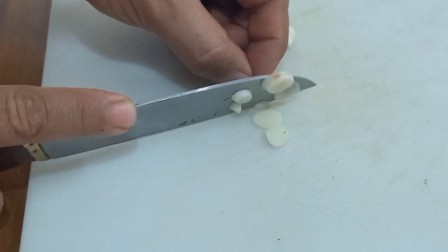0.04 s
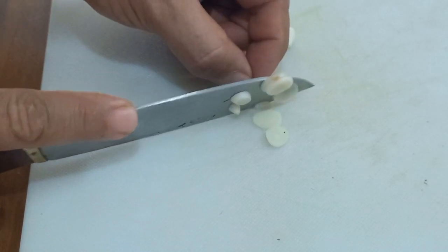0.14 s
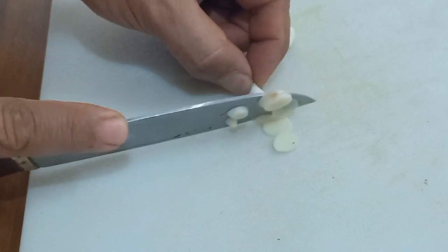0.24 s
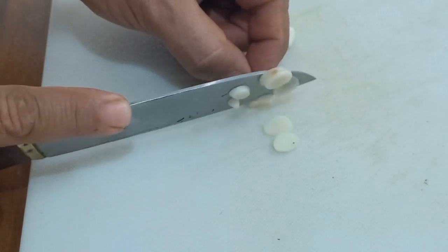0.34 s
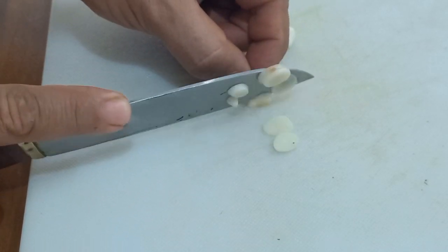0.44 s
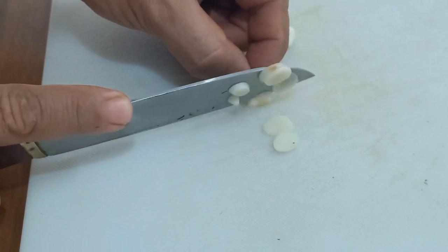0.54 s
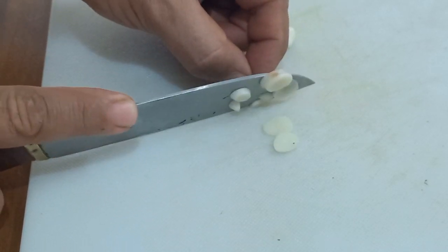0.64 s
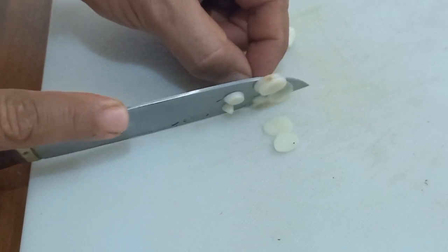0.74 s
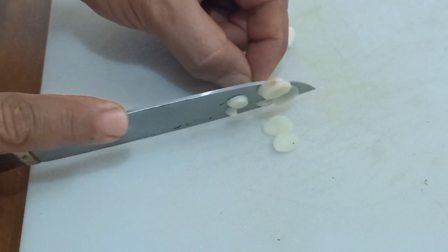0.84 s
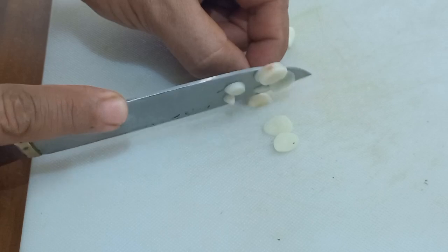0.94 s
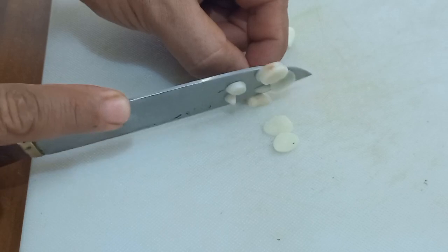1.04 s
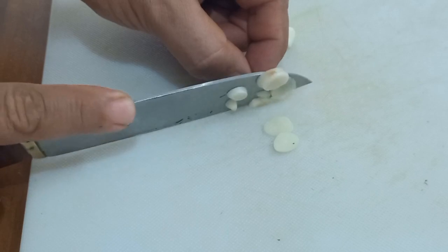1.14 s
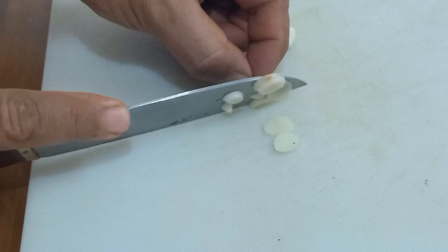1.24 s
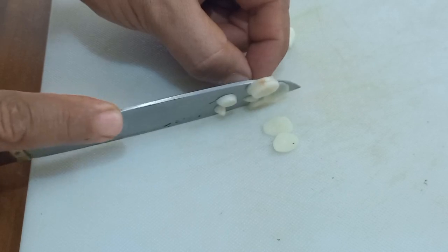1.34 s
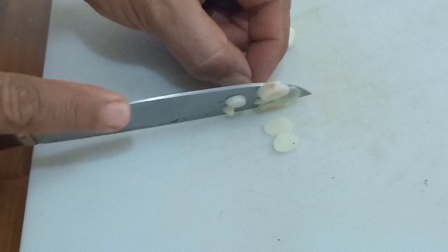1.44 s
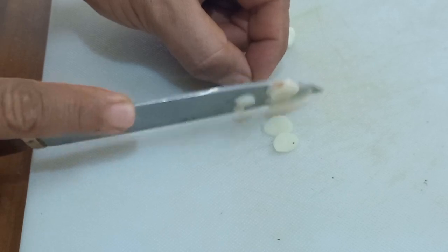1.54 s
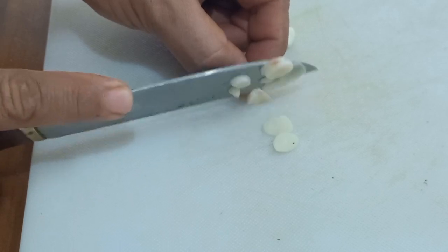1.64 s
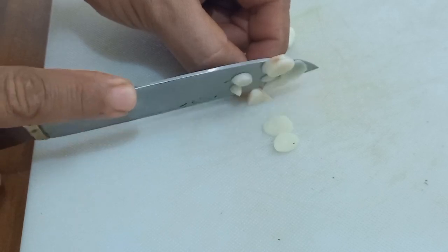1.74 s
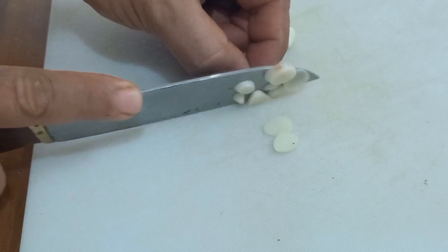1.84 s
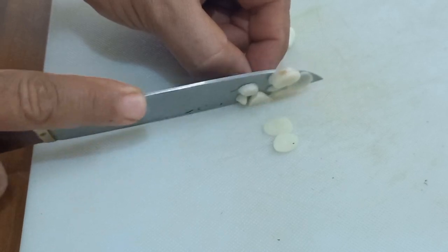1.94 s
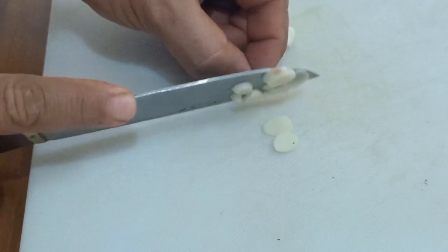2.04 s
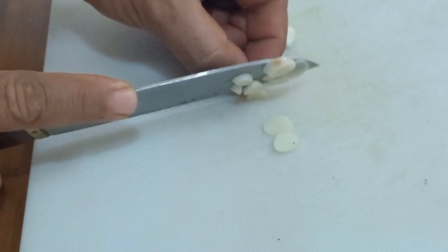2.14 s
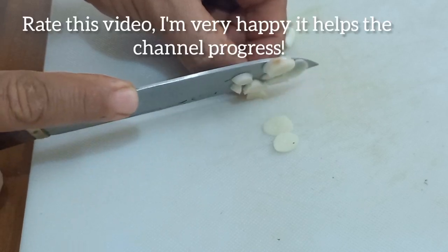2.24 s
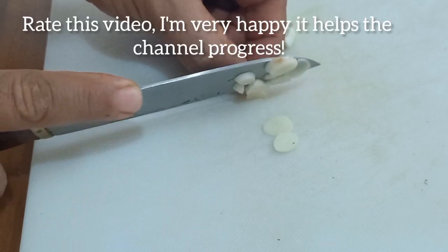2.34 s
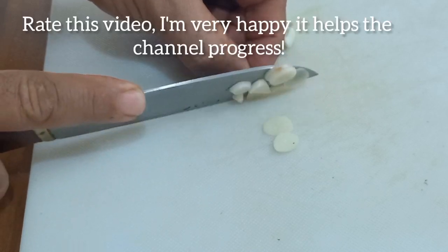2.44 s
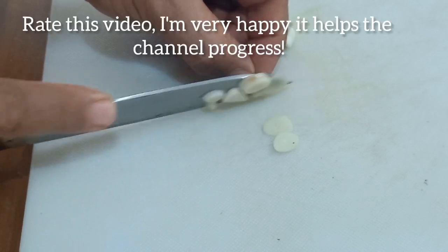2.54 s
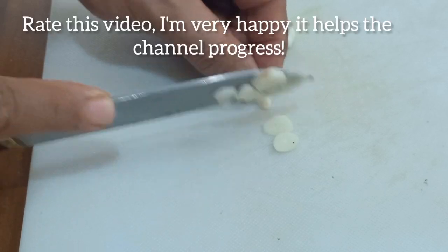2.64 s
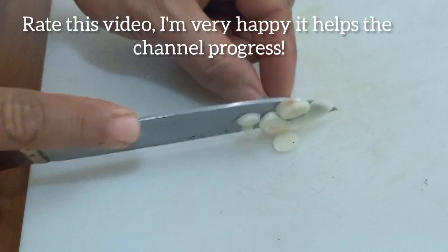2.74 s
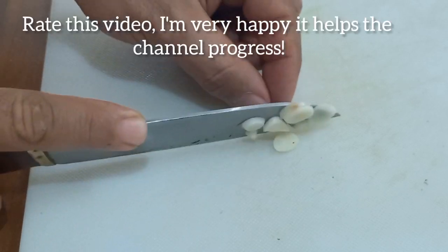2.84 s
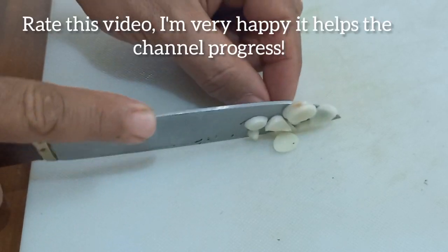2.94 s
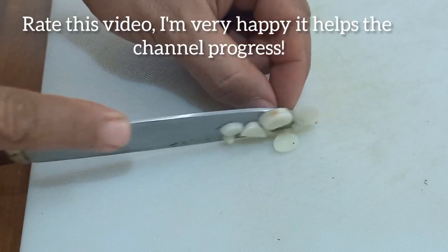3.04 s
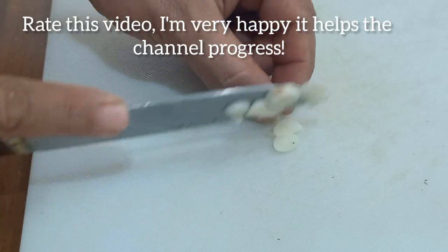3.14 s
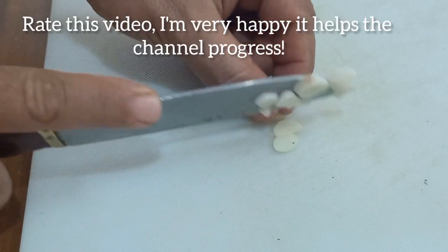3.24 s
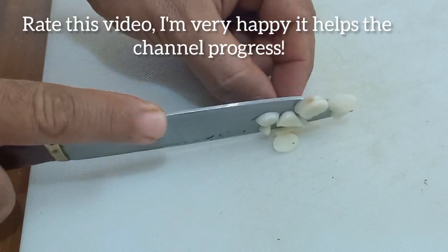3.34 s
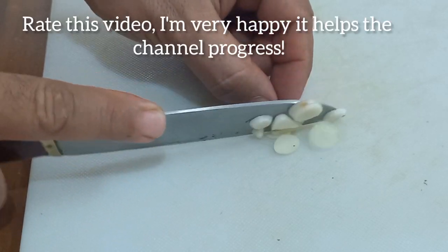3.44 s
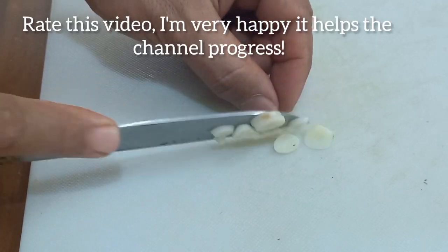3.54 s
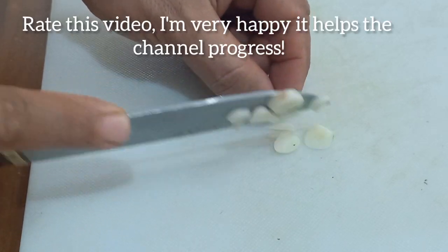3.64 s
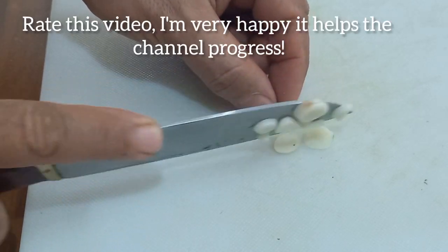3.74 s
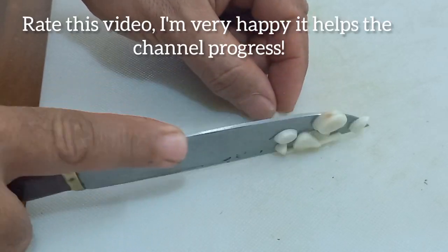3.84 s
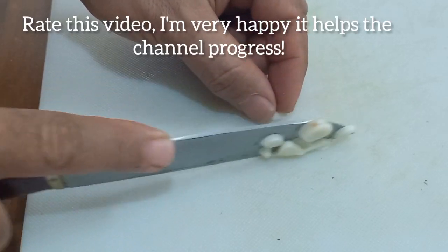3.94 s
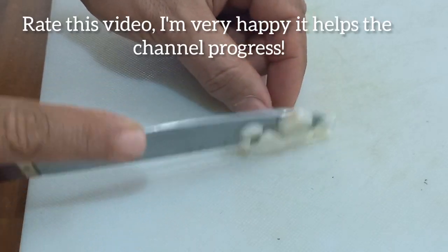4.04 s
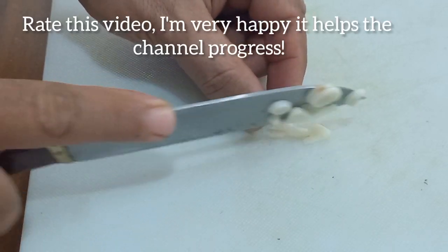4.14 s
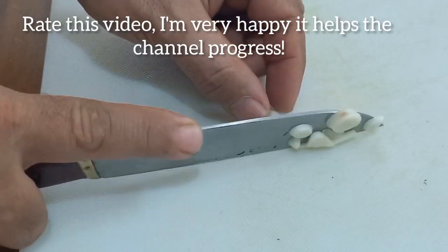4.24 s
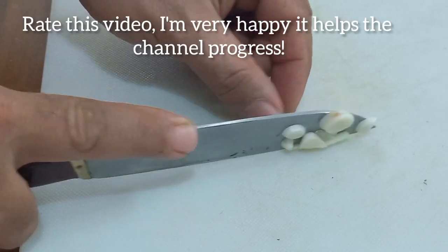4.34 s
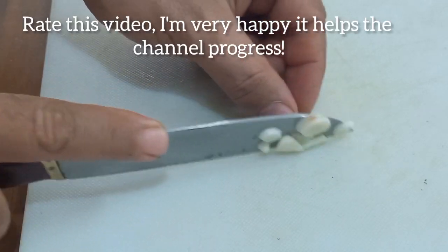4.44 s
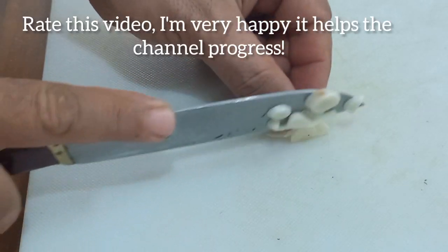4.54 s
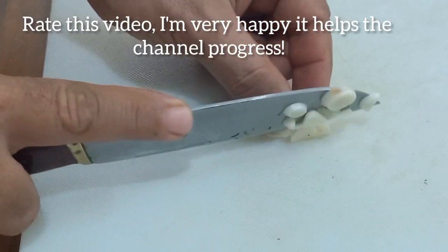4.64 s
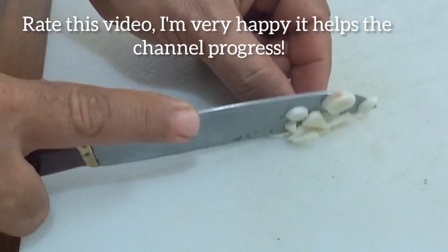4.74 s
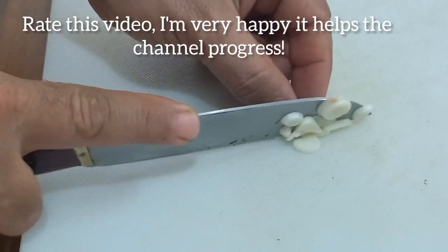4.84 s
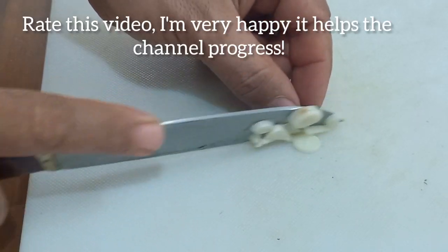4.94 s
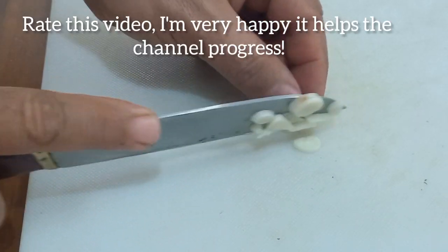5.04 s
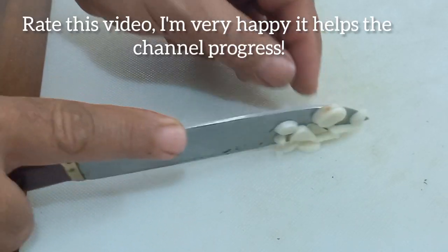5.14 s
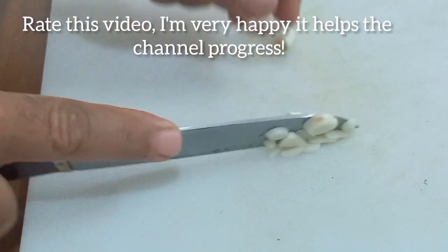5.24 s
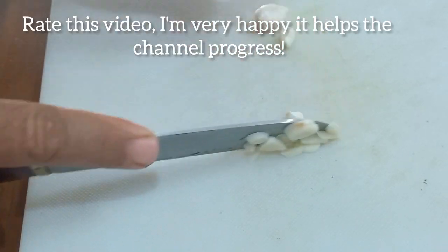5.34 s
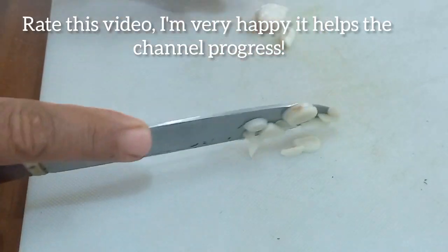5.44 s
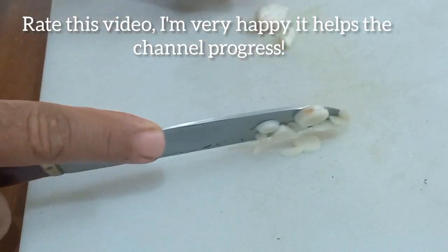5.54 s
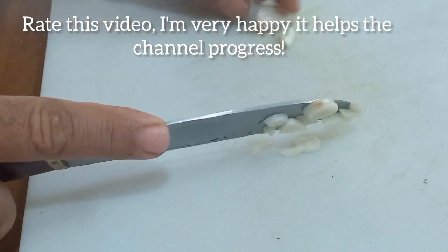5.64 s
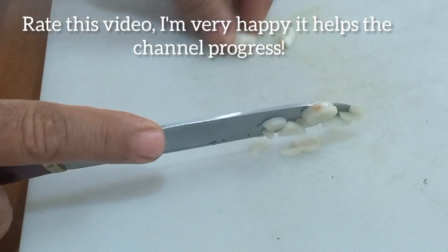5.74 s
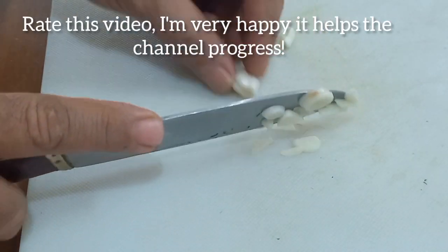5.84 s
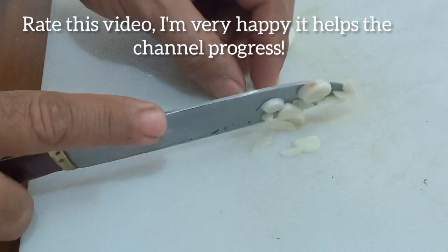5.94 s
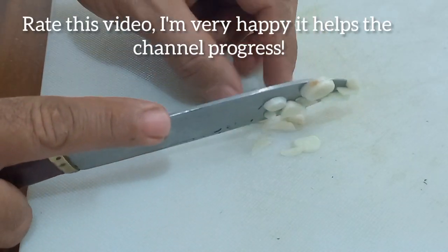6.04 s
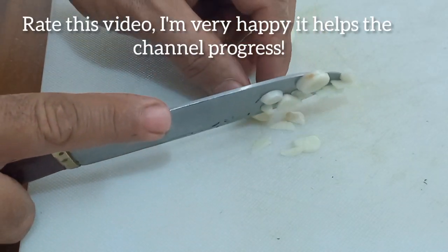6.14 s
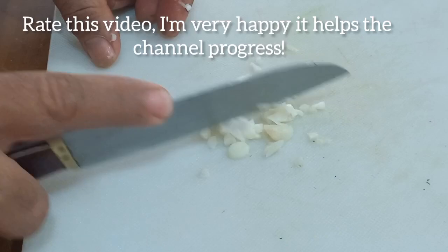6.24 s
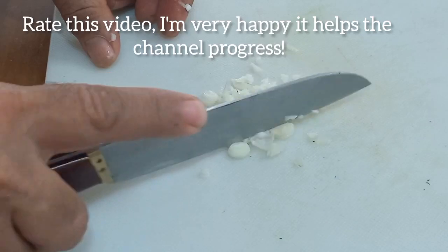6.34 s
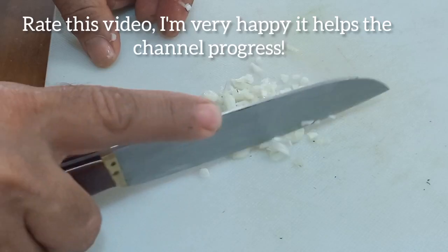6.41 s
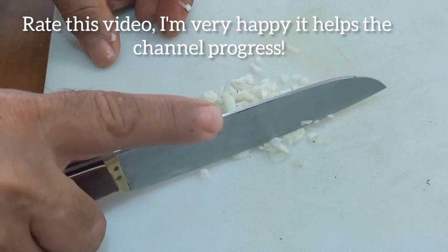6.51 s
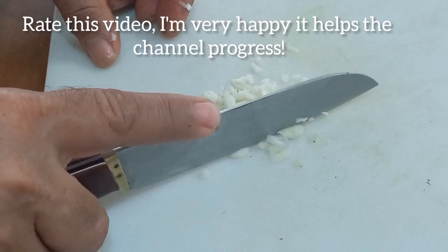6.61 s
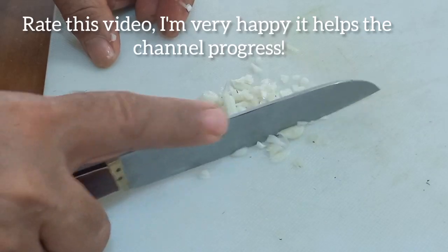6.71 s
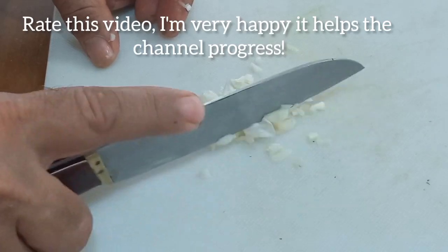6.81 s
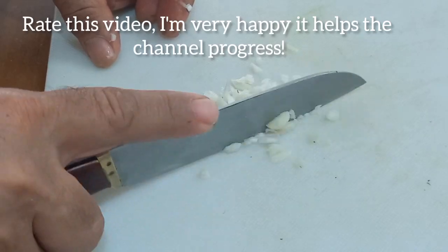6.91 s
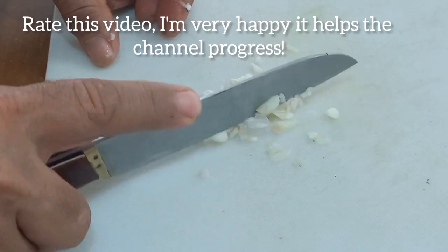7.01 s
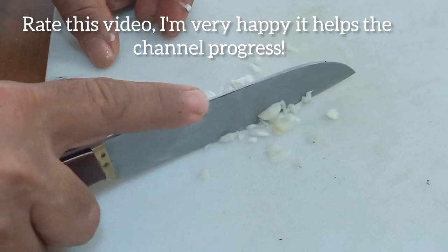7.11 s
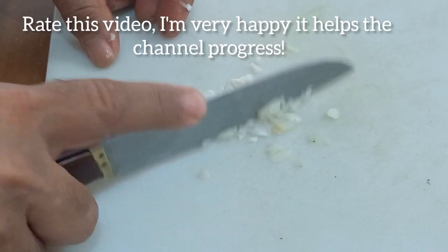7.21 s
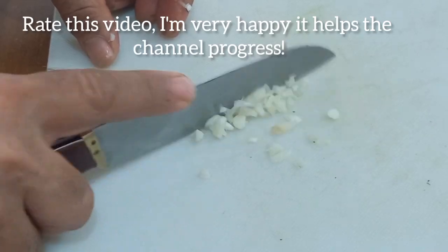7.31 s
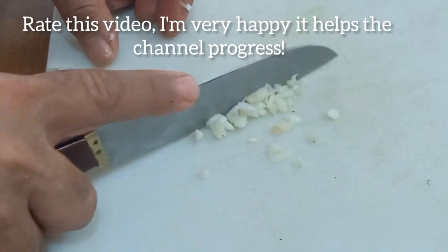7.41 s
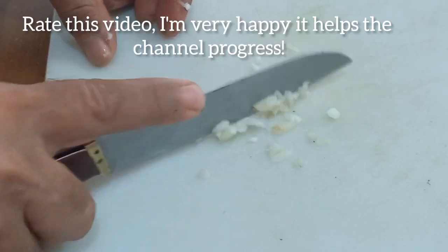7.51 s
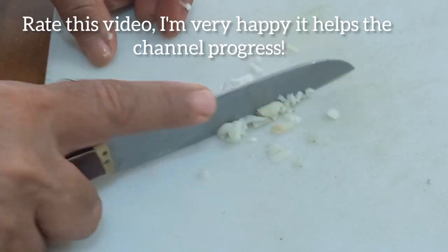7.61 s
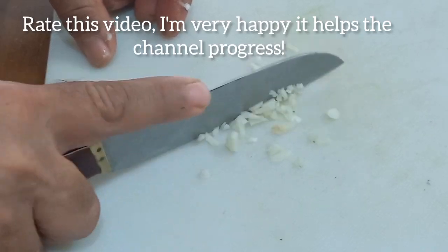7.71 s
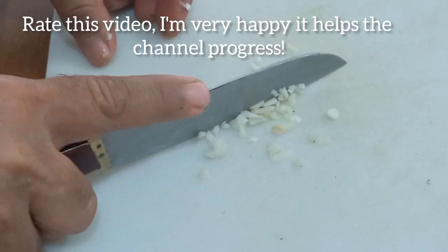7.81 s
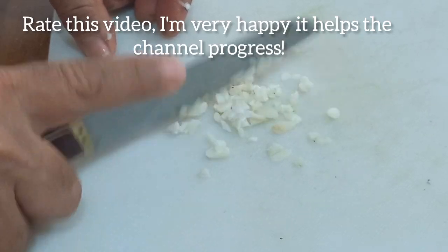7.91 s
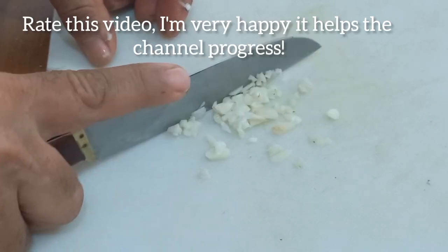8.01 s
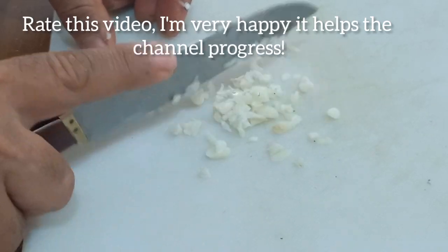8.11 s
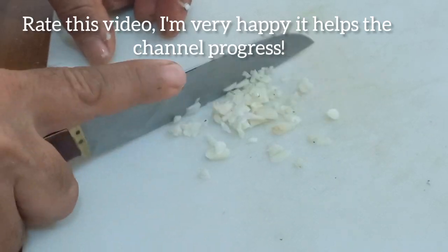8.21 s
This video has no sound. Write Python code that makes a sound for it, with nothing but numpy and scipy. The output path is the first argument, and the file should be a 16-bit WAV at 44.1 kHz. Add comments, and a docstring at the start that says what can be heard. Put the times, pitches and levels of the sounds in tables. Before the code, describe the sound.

Close stereo pickup in a small hard-walled kitchen. A knife slices garlic on a plastic board, each stroke a short hollow clack with a bright click, roughly every half second. Between strokes come faint crunches and dry finger rustle. After a brief pause, duller, heavier mincing chops follow at uneven, quicker spacing. Soft room hiss, a low wavering hum and faint high chirps lie behind.

```python
"""A small hard-walled kitchen: a knife slices garlic on a plastic board, pauses, then minces it.
Each stroke is a set of ringing board, blade and table modes plus a noisy clack, a bright click and a crackle.
Soft pushes, splitting cloves and a dry rustle are built from tiny impacts; shaped noise is the room's answer.
Behind it sit filtered-noise hiss, a wavering low hum from narrow noise bands, and faint fluttering high chirps."""
import sys
import numpy as np
from scipy import signal
from scipy.fft import rfft, irfft, next_fast_len
from scipy.io import wavfile
from scipy.ndimage import uniform_filter1d

SR = 44100
rng = np.random.default_rng(int(sys.argv[2]) if len(sys.argv) > 2 else 0)


def transcribe(u):
    """Save the signal u as a 16-bit wav file named by the first command-line argument.

    u: samples, shape (n,) or (channels, n), limited to [-1, 1]; the rate is SR.
    q: integer samples, one column per channel.
    """
    v = np.clip(np.atleast_2d(u).T, -1, 1)
    q = np.round(v * 32767).astype(np.int16)
    wavfile.write(sys.argv[1], SR, q)


N = 364707  # length in samples

# steady room hiss: [f/Hz, relative level/dB per Hz]
AIR_SPECTRUM = [(30, -9), (85, -21.5), (120, 1), (180, -6.5), (280, -9), (680, -11.5), (950, -21.5),
                (2200, -20), (4500, -20.5), (7400, -26), (8200, -35.5), (10800, -36), (12500, -30.5),
                (16000, -32.5)]
# narrow bands of wavering hum: [f/Hz, width/Hz, level/dB]
HUM_BANDS = [(123.2, 22, -58.5), (231, 39, -61), (1880, 190, -68)]
# kitchen reverberation by band: [f/Hz, relative level/dB, t60/s]
KITCHEN_BANDS = [(60, -4.5, 0.44), (130, 6.5, 0.38), (180, 0, 0.41), (302, 2, 0.34), (635, 0.5, 0.35),
                 (785, 0.5, 0.37), (1200, 3.5, 0.28), (2450, -3, 0.3), (5000, -5.5, 0.27), (9200, -8, 0.27),
                 (16100, 2.5, 0.27)]
# the nearer chirps, likely small birds outside: [t/s, f/Hz, peak level/dB]
NEAR_CHIRPS = [(.155, 3260, -49), (.403, 3320, -45), (.697, 2470, -45), (1.015, 3400, -48.5),
               (1.259, 3100, -51.5), (1.652, 4100, -48), (2.065, 3700, -47), (2.596, 3850, -48),
               (4.098, 3740, -45), (4.12, 4840, -48), (5.059, 3860, -49), (5.32, 3360, -44),
               (5.713, 3520, -49), (6.191, 4000, -47), (6.528, 2790, -48.5), (6.844, 3870, -46.5)]
# spells of dry rustle, likely fingers shifting their grip on the garlic: [start t/s, length/s, level/dB]
GRIP_SHIFTS = [(0, .15, -58.5), (0.526, 0.82, -59), (4.076, 0.12, -57.5), (4.624, 0.064, -53.5),
               (5.493, 0.41, -60), (6.03, 0.37, -64), (7.8, 0.17, -58)]
# garlic splitting under the edge: [t/s, level/dB, length/ms, first snap/dB]
GARLIC_CRUNCHES = [(0.248, -50, 25, 0), (0.293, -54.5, 16, 9), (0.603, -50, 25, -2), (0.8385, -48, 8.5, -1),
                   (1.779, -49, 31, -6), (2.001, -49.5, 12, 2), (3.637, -57, 13, -17),
                   (3.706, -53, 10.3, 3), (4.003, -47, 9.2, 2), (4.636, -53, 57, -4),
                   (5.562, -56.5, 73, -5), (5.8, -55.5, 69, -17), (6.038, -54.5, 32, -12),
                   (7.193, -46, 13.3, -1), (7.315, -54.5, 42, -20), (7.94, -50.5, 39, -3.5)]
# blade and fingers pressing softly on the board: [t/s, level/dB, length/ms, table thump/dB]
SOFT_NUDGES = [(.255, -55.5, 35, -17), (1.384, -50.5, 34, 0), (1.78, -44, 17.4, 13.5), (1.828, -64, 14, 17),
               (1.987, -44.5, 25.4, -17), (2.689, -54, 170, 9), (5.84, -55.5, 109, 8),
               (6.609, -47.5, 9.7, 12), (6.868, -40, 8.8, 19), (7.099, -37.5, 12, 5.5), (7.302, -43, 24, 9),
               (7.514, -43, 13.8, 10), (7.957, -45.5, 19.2, 4)]
# modes of table, board and blade:
# [f/Hz, t60/s, level/dB struck with the tip, with the belly, with the heel]
BOARD_MODES = [(83.6, 0.15, -21, -22, -7.5), (125, 0.18, -3, -3.5, -2.5), (161.5, 0.16, -10.5, -11, -10),
               (239.4, 0.13, -7.5, -14, -3.5), (270, 0.19, -3, -4, -11), (321, 0.052, -4.5, -9.5, -6),
               (346.7, 0.088, -7.5, -2.5, -1.5), (418, 0.11, -2, -11, -2.5), (484.6, 0.11, -3.5, -13, 1.5),
               (588.3, 0.087, 6, 1.5, -7), (647.6, 0.095, 2, 2, 1), (791, 0.36, -17, -0.5, -2.5),
               (860, 0.32, -42, -18, -31), (980, 0.11, 1.5, -6, -44), (1047, 0.029, 2, -20.5, -18),
               (1164, 0.088, -18, -6, -5), (1190, 0.098, -23, -1.5, -2.5), (1302, 0.083, -9, 0.5, -6),
               (1389, 0.16, 2, -10, -1.5), (1473, 0.19, -3, -0.5, -6.5), (1596, 0.24, -2, -8, -9),
               (1894, 0.056, 6.5, -7, -1.5), (1961, 0.075, 0, -18, 2), (2035, 0.049, -7, -16, -8),
               (2275, 0.076, -38, -25, -14), (2649, 0.046, -0.5, -8, -7), (2867, 0.043, -3, -4, -19),
               (3100, 0.027, -14.5, -7, -37), (3370, 0.014, -35.5, -19, -32),
               (3800, 0.0083, -23, -15.5, -32)]
# the crowd of fast-dying board modes between and above those: [f/Hz, relative level/dB]
CLACK_SPECTRUM = [(60, -25), (150, -4.5), (500, 3.5), (1200, 0.5), (1650, -5), (2000, 4), (3000, -4),
                  (4200, -7.5), (6000, -17), (7300, -21.5), (8600, -31), (12000, -36), (16000, -48)]
# knife strokes: [t/s, level/dB, place (0 tip, 1 belly, 2 heel), time the edge takes to settle/ms,
#  settling level/dB, weight of the hand as table thump/dB, sharpness of the contact as tick/dB]
KNIFE_STROKES = [(0.063, -27, 0.26, 8.6, -17, -0.5, -2.5), (0.619, -32.5, 0.12, 9, -2.5, 7.5, -22),
                 (1.112, -23.5, 0.093, 9.75, -5.5, 4, -7), (1.8564, -16, 0, 6.3, -26, 1, -4),
                 (2.4141, -14, 0, 6.05, -7.5, 2, -2), (2.92, -23.5, 1.5, 10.7, -3.5, -4, -1.5),
                 (3.4011, -20, 0.82, 14.4, 6, -4.5, 0.5), (3.8776, -18.5, 0.86, 11.7, -17, -2, 3),
                 (4.2676, -27, 0.72, 7.96, -5, 2, -2.5), (4.8222, -18, 1, 15.4, -0.5, 2.5, 1.5),
                 (5.2158, -30, 0.92, 7.45, -5, 1.5, -5.5), (6.6378, -17, 2, 20, -2.5, 6, 0),
                 (6.8847, -22, 1.6, 14, 2.5, 1.5, -0.5), (7.1132, -24.5, 1.9, 21, 7.5, 5.5, -2.5),
                 (7.5391, -20, 2, 11.6, -2, 5, -2), (7.7321, -27.5, 1.67, 3.9, -5.5, 5.5, -3),
                 (8.1577, -19.5, 1.85, 20.4, 12, -4, 5)]

# room air: level, slow drift and faster flutter
AIR_DB, AIR_DRIFT_DB, AIR_FLUTTER_DB = -55, 0.06, 0.5
# the flock behind the nearer chirps: pitch range, and the softest chirp at each of two distances
FLOCK_LOW_HZ, FLOCK_HIGH_HZ = 2884, 5000
FLOCK_NEAR_DB, FLOCK_FAR_DB = -58, -64
# swell and fade of a grip shift, and the rustle of the resting hand
GRIP_ATTACK_S, GRIP_RELEASE_S, RESTING_GRIP_DB = 0.016, 0.06, -70
# a heavy hand fills out the body of the board (dB, dB per dB of thump)
BODY_DB, BODY_PER_THUMP = 0, 0.49
# a sharp or hard contact cracks (dB, dB per dB of tick, dB per dB above the usual chop)
CRACK_DB, CRACK_PER_TICK, CRACK_PER_LEVEL, USUAL_CHOP_DB = -0.8, 0.18, 0.21, -22
# pressed hard or struck with the heel, the board sends less into the room (dB, dB per dB, dB per step of place)
ROOM_DB, ROOM_LOSS_PER_THUMP, ROOM_LOSS_PER_PLACE_DB = -4.5, 0.6, 0.84
TOP_HZ = 16050  # top of the recorder's band


def undb(db):
    """Decibels to gain."""
    return 10 ** (np.asarray(db) / 20)


def unit(x):
    """Scale to an energy of 1 per channel."""
    return x / np.sqrt(np.mean(np.sum(x ** 2, axis=-1)))


def level(x, db):
    """Scale to an rms level."""
    return x * undb(db) / np.sqrt(np.mean(x ** 2))


def add(out, s, x):
    """Mix a stereo sound in at time s."""
    i = min(max(int(s * SR), 0), out.shape[1])
    out[:, i:i + x.shape[1]] += x[:, :out.shape[1] - i]


def on_log_axis(hz, points):
    """Read (f/Hz, value) points at any frequency."""
    f, value = np.transpose(points)
    return np.interp(np.log(hz + 1), np.log(f), value)


def colour(x, points):
    """Causal filter through (f/Hz, level/dB) points, built from the cepstrum of the gain."""
    n = 2 * next_fast_len(x.shape[-1] // 2 + 2048)
    gain = undb(on_log_axis(np.fft.rfftfreq(n, 1 / SR), points))
    cepstrum = irfft(np.log(gain))
    # folding the cepstrum forward in time makes the filter minimum phase
    cepstrum[1:n // 2] *= 2
    cepstrum[n // 2 + 1:] = 0
    return irfft(rfft(x, n) * np.exp(rfft(cepstrum)))[..., :x.shape[-1]]


def diffuse(n, apart_hz):
    """Noise at two close microphones: alike in the bass, unrelated above apart_hz."""
    mid, side = rfft(rng.standard_normal((2, n)))
    alike = .92 / (1 + (np.fft.rfftfreq(n, 1 / SR) / apart_hz) ** 2)
    mid, side = mid * np.sqrt(1 + alike), side * np.sqrt(1 - alike)
    return irfft([mid + side, mid - side], n) / np.sqrt(2)


def decay(t, t60):
    """Exponential fade that loses 60 dB in t60 seconds."""
    return np.exp(-np.log(1000) * t / t60)


def walk(rate):
    """Random levels held 1 / rate s and slewed twice; spread near 1."""
    k = int(SR / rate)
    steps = np.repeat(rng.standard_normal(N // k + 1), k)
    return uniform_filter1d(uniform_filter1d(steps, k), k)[:N] * np.sqrt(2)


def background(hiss_left_db=2):
    """Room air and narrow humming bands of noise; the left microphone hisses more."""
    air = colour(diffuse(N, apart_hz=740), AIR_SPECTRUM)
    air[0] = colour(air[0], [(1000, 0.92), (2500, 0.38), (5000, 0.43), (9000, hiss_left_db)])
    air[1] = colour(air[1], [(1000, -1.5), (2500, 0.5), (5000, -1.1), (9000, -7.0)])
    air_db = AIR_DB + AIR_DRIFT_DB * walk(1) + AIR_FLUTTER_DB * walk(9.5)
    air = level(air, 0) * undb(air_db)
    hz = np.fft.rfftfreq(N, 1 / SR)
    bands = 0
    for centre, width, db in HUM_BANDS:
        resonance = 1 / (1 + (2 * (hz - centre) / width) ** 2)
        bands = bands + undb(db) * unit(resonance)
    hum = irfft(rfft(diffuse(N, apart_hz=703)) * bands, N) * np.sqrt(len(hz))
    return air + hum


def kitchen(first_ms=7, build_ms=9, blur_hz=70):
    """Room response: reflections build up after the nearest wall, then each band decays at its own rate."""
    t = np.arange(SR // 2) / SR
    hz = np.fft.rfftfreq(len(t), 1 / SR)
    rows = np.array(KITCHEN_BANDS)
    onset = np.clip((t * 1000 - first_ms) / build_ms, 0, 1)
    noise = diffuse(len(t), apart_hz=900)
    # the room's modes overlap densely, so no narrow band of the tail stands out
    heard = rfft(noise * onset * decay(t, np.median(rows[:, 2])))
    power = uniform_filter1d(np.mean(abs(heard) ** 2, axis=0), int(blur_hz / hz[1]))
    noise = rfft(noise) / np.sqrt(power)
    tail = 0
    for share, (_, db, t60) in zip(np.eye(len(rows)), rows):
        band = irfft(noise * on_log_axis(hz, np.c_[rows[:, 0], share]), len(t))
        tail = tail + undb(db) * band * decay(t, t60)
    return unit(tail * onset)


def in_kitchen(x, room_db, feed=None):
    """Direct sound plus the reverberation of what reaches the walls (feed, by default the same sound)."""
    to_walls = x if feed is None else feed
    wet = signal.fftconvolve(to_walls, kitchen(), axes=1) * undb(room_db)
    wet[:, :x.shape[1]] += x
    return wet


def chirp(hz, db, attack_s=0.0034, decay_s=0.011, glide=0.026, rasp=0.073, rasp_hz=700):
    """A short scratchy note: its pitch glides down and flutters too fast to follow."""
    t = np.arange(SR // 12) / SR
    flutter = level(uniform_filter1d(rng.standard_normal(len(t)), int(SR / rasp_hz)), 0)
    pitch = hz * (1 + glide * np.exp(-t / decay_s) + rasp * flutter)
    tone = np.sin(2 * np.pi * np.cumsum(pitch) / SR + rng.uniform(0, np.pi, (2, 1)))
    swell = (1 - np.exp(-t / attack_s)) * np.exp(-t / decay_s)
    return tone * swell / swell.max() * undb(db)


def flock(db, count, spread_db=6):
    """Chirps of random pitch and strength, loosely spaced in time."""
    out = np.zeros((2, N))
    for k, (when, pitch, size) in enumerate(rng.random((count, 3))):
        s = (k + when) / count * N / SR
        hz = FLOCK_LOW_HZ + pitch * (FLOCK_HIGH_HZ - FLOCK_LOW_HZ)
        add(out, s, chirp(hz, db + spread_db * size))
    return out


def twitter():
    """The nearer chirps, and many fainter ones behind them."""
    out = flock(FLOCK_NEAR_DB, count=26, spread_db=5.5)
    out += flock(FLOCK_FAR_DB, count=130, spread_db=5.5)
    for s, hz, db in NEAR_CHIRPS:
        add(out, s, chirp(hz, db))
    return out


def finger_work():
    """Gain of the rustle: each shift of grip swells, holds and dies back to the resting hand."""
    t = np.arange(N) / SR
    gain = undb(RESTING_GRIP_DB)
    for s, length, db in GRIP_SHIFTS:
        attack = np.clip((t - s) / GRIP_ATTACK_S, 0, 1)
        release = np.exp(-np.maximum(t - s - length, 0) / GRIP_RELEASE_S)
        gain = np.maximum(gain, undb(db) * attack * release)
    return gain


def rustle(count=1100, spread_db=4):
    """Sparse dry ticks of uneven size, swelling with the work of the fingers."""
    when, size, side = rng.random((count, 3)).T
    ticks = np.zeros((2, N))
    strength = undb(-spread_db * np.log(1 - .97 * size))
    ticks[:, (when * (N - 1)).astype(int)] = strength * np.sqrt([side, 1 - side])
    # each tick is a burst of crackle fading over about a millisecond
    envelope = signal.lfilter([1], [1, -np.exp(-1000 / SR)], ticks)
    crackle = envelope * rng.standard_normal((2, N))
    sound = colour(crackle, [(300, -18.5), (1500, 1.5), (2400, 1.5), (3400, 7), (5000, 0.5),
                             (7000, -13), (9000, -18.5), (16000, -11.5)])
    return level(sound, 0) * finger_work()


def grains(ms, per_s, spread_db):
    """A burst of uneven tiny impacts that swells and fades."""
    n = max(int(ms * SR / 1000), 16)
    count = int(n * per_s / SR) + 2
    when, size, sign = rng.random((count, 3)).T
    strength = undb(-spread_db * np.log(1 - size)) * np.sqrt(np.sin(np.pi * when))
    burst = np.zeros(n)
    np.add.at(burst, (when * n).astype(int), np.sign(sign - .5) * strength)
    return unit(burst)


def crunch(db, ms, snap_db):
    """The skin of the clove snaps, then its cells burst in a fine crackle."""
    cells = grains(ms, per_s=1500, spread_db=0.5)
    cells[0] += undb(snap_db)
    t = np.arange(SR // 50) / SR
    pop = rng.standard_normal((2, len(t))) * np.exp(-t / 0.0021)
    crackle = signal.fftconvolve(pop, cells[None], axes=1)
    sound = colour(crackle, [(300, -4), (2000, 5.5), (4500, 2.0), (7000, -5.0), (9000, -15.0),
                             (13000, -10.5), (16000, -13.5)])
    return unit(sound) * np.sqrt(SR * ms / 1000) * undb(db)


def board(place, clack_db=-3, clack_t60=0.093, treble_t60=0.039, tick_db=-5, tick_t60=0.021,
          apart_hz=950, rise_ms=0.37, scatter_db=1.34):
    """Stereo ring of one blow; the place of contact decides which modes speak."""
    t = np.arange(SR // 6) / SR
    hz, t60, *by_place = np.transpose(BOARD_MODES)
    nearness = np.maximum(1 - abs(np.clip(place, 0, 2) - np.arange(len(by_place))), 0)
    db = nearness @ np.array(by_place)
    detune, size, apart = rng.standard_normal((len(hz), 3)).T
    gain = undb(db + scatter_db * size) / t60
    # short waves reach the two microphones out of step
    lag = np.sign(apart) * np.minimum(hz / apart_hz, 1) ** 2 * np.pi / 4
    phase = rng.uniform(0, 2 * np.pi, len(hz)) + np.outer([1, -1], lag)
    poles = 2j * np.pi * hz * (1 + 0.0027 * detune) - np.log(1000) / t60
    ring = np.imag((gain * np.exp(1j * phase)) @ np.exp(np.outer(poles, t)))
    ring *= 1 - np.exp(-(t * 1000 / rise_ms) ** 2)
    # plastic damps the highest modes fastest, and the first instant of contact is the sharpest
    crowd = diffuse(len(t), apart_hz=910)
    low = signal.sosfiltfilt(signal.butter(2, 3500, fs=SR, output="sos"), crowd)
    slow, fast, snap = (unit(decay(t, t60_s)) for t60_s in (clack_t60, treble_t60, tick_t60))
    body = undb(clack_db) * (low * slow + (crowd - low) * fast)
    clack = colour(body + undb(tick_db) * crowd * snap, CLACK_SPECTRUM)
    return unit(ring) + np.hypot(undb(clack_db), undb(tick_db)) * unit(clack)


def nudge(db, ms, thump_db):
    """A push cushioned by garlic: the board answers dully."""
    push = signal.fftconvolve(board(2.0), grains(ms, per_s=700, spread_db=2.5)[None], axes=1)
    push = colour(push, [(130, thump_db), (350, 1.5), (900, -8.5), (2500, -12), (7000, -16)])
    return unit(push) * np.sqrt(SR * (ms + 10) / 1000) * undb(db)


def edge_click(t60=0.011):
    """Steel meeting bare plastic: one thin, bright instant."""
    t = np.arange(SR // 50) / SR
    burst = rng.standard_normal((2, len(t))) * decay(t, t60)
    return unit(colour(burst, [(800, -6), (2500, 4.0), (4000, 3), (5500, -17), (7300, -21),
                               (9000, -33), (12000, -11), (16000, -20)]))


def stroke_colour(db, thump_db, tick_db, place):
    """Body, crack and room levels in dB follow from the force, weight, sharpness and place of the stroke."""
    body_db = BODY_DB + BODY_PER_THUMP * thump_db
    crack_db = CRACK_DB + CRACK_PER_TICK * tick_db + CRACK_PER_LEVEL * (db - USUAL_CHOP_DB)
    room_db = ROOM_DB - ROOM_LOSS_PER_THUMP * thump_db - ROOM_LOSS_PER_PLACE_DB * place
    return body_db, crack_db, room_db


def chop(db, place, settle_ms, settle_db, thump_db, tick_db, left_db=1.6, juice_db=-37, click_db=-20,
         padding_db=-3, cushion_db=-4, radiate_s=0.005):
    """The edge hits the board, then more of its length lands in quick, duller knocks while the garlic crackles."""
    body_db, crack_db, room_db = stroke_colour(db, thump_db, tick_db, place)
    hit, settle, feed = np.zeros((3, 2, SR // 3))
    # the walls hear the board from all sides: its modes blur into the short first swing of each knock
    first_swing = np.exp(-np.arange(SR // 6) / SR / radiate_s)
    ring = board(place)
    add(hit, 0, ring)
    add(feed, 0, unit(ring * first_swing))
    for share in np.arange(1, 4) / 3:  # three settling knocks
        ring, size = board(place), undb(settle_db) / np.sqrt(3)
        s = share * settle_ms / 1000
        add(settle, s, size * ring)
        add(feed, s, size * unit(ring * first_swing))
    hit += colour(settle, [(1500, 0), (5000, cushion_db)])
    contact = [(130, thump_db), (300, body_db), (620, body_db), (900, 0), (1500, 0),
               (2200, crack_db), (3800, crack_db), (6500, tick_db)]
    hit = in_kitchen(unit(colour(hit, contact)), room_db, unit(colour(feed, contact)))
    add(hit, 0, undb(juice_db) * unit(crunch(0, settle_ms + 15, 0)))
    # the tip meets bare plastic; further back the garlic pads the edge
    add(hit, 0, undb(click_db + tick_db + padding_db * place) * edge_click())
    # the stroke's level is that of its first 30 ms, set for each ear
    attack = hit[:, :int(.03 * SR)]
    attack_rms = np.sqrt(np.mean(attack ** 2, axis=1, keepdims=True))
    ear_db = db + np.array([[left_db], [-left_db]]) / 2
    return hit * undb(ear_db) / attack_rms


def scene(chirp_db=0, nudge_db=0, crunch_db=0, handling_room_db=-3, chirp_room_db=-1):
    """Knife work on the board over the background."""
    out, handling = background(), rustle()
    chirps = in_kitchen(twitter(), chirp_room_db)[:, :N]
    out += undb(chirp_db) * chirps
    for s, db, ms, snap_db in GARLIC_CRUNCHES:
        add(handling, s, crunch(db + crunch_db, ms, snap_db))
    for s, db, ms, thump_db in SOFT_NUDGES:
        add(handling, s, nudge(db + nudge_db, ms, thump_db))
    out += in_kitchen(handling, handling_room_db)[:, :N]
    for s, *stroke in KNIFE_STROKES:
        add(out, s, chop(*stroke))
    return out


def record(dry, low_cut_hz=55, left_bright_db=2):
    """The microphones drop deep bass, the left one brighter; the recorder clips at full scale and cuts the top."""
    left, right = (colour(x, [(5500, 0.012), (9000, side * left_bright_db)]) for x, side in zip(dry, (1, -1)))
    low_cut = signal.butter(4, low_cut_hz, "high", fs=SR, output="sos")
    sound = signal.sosfilt(low_cut, np.array([left, right]))
    top_cut = signal.ellip(10, .2, 70, TOP_HZ, fs=SR, output="sos")
    return signal.sosfilt(top_cut, np.clip(sound, -1, 1))


dry = scene()
out = record(dry)
transcribe(out)
```